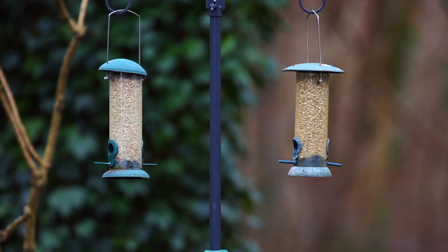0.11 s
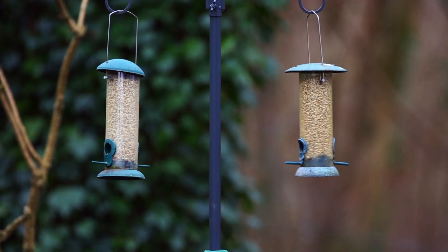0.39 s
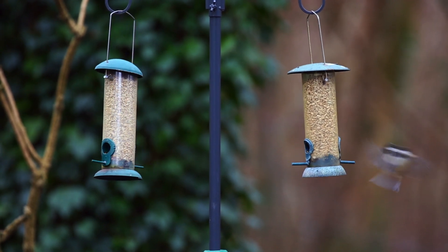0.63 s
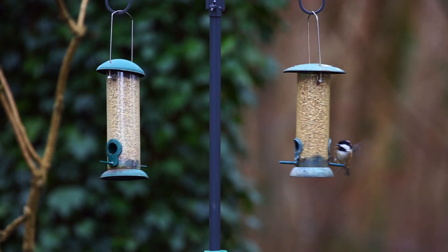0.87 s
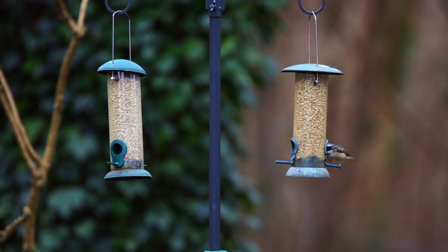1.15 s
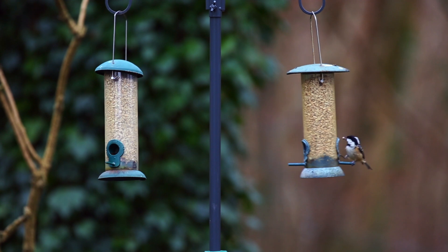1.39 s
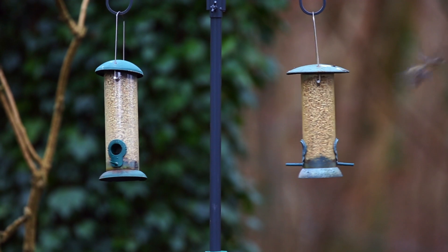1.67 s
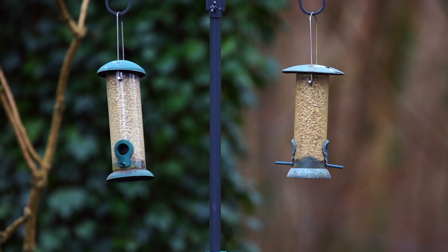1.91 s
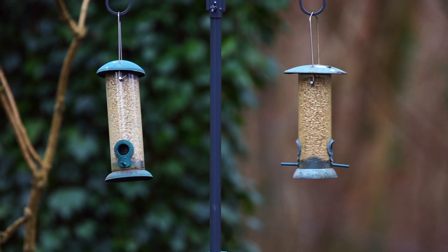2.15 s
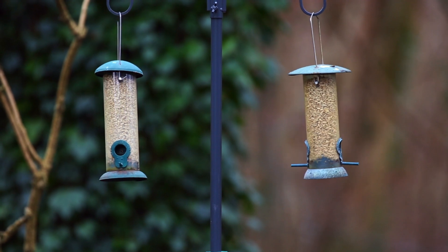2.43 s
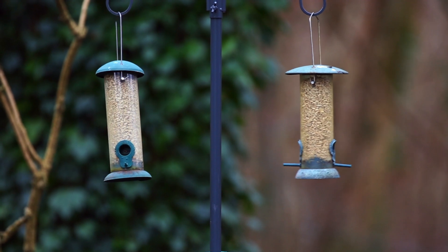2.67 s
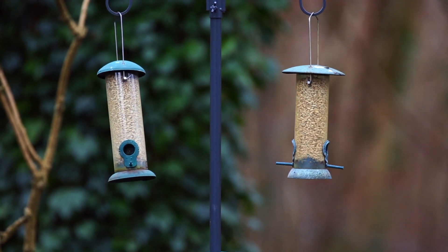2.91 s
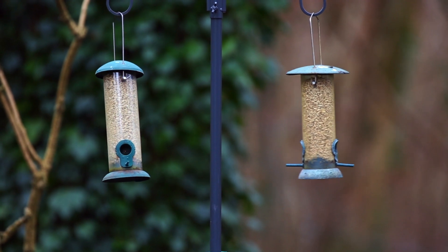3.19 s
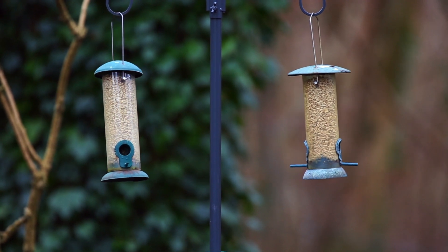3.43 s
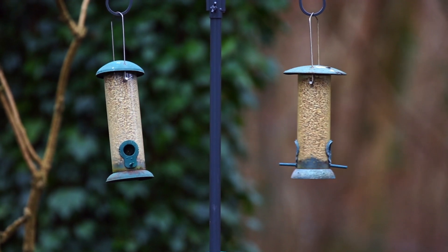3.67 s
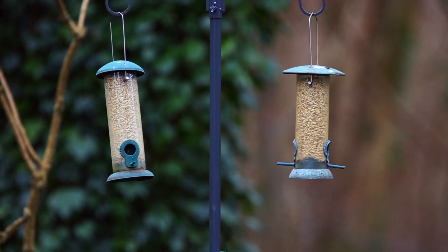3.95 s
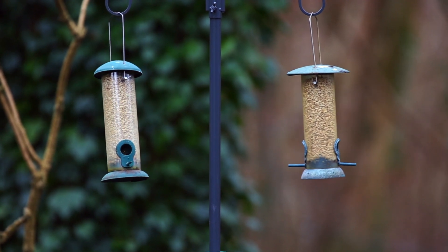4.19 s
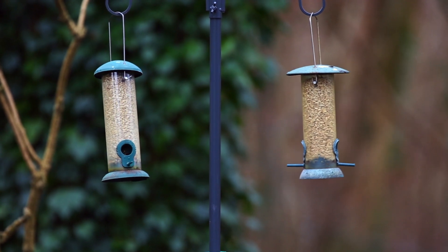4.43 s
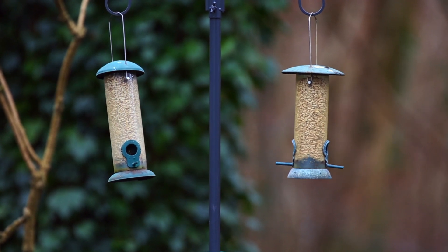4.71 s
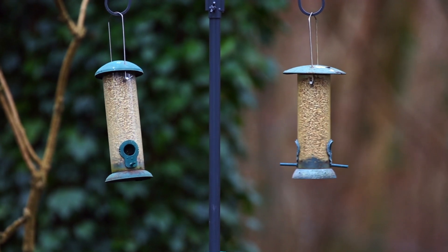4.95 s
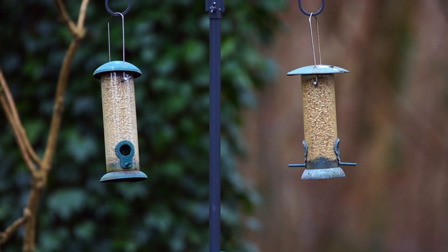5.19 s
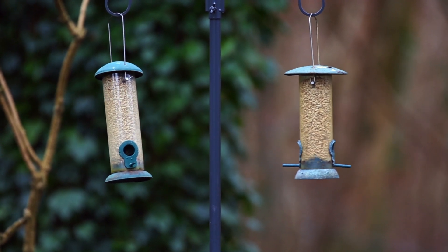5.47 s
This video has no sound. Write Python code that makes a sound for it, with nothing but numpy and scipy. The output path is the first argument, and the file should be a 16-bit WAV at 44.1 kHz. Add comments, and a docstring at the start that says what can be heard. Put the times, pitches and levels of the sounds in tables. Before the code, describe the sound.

At a garden feeder by a wood, sparse faint notes give way to crisp chips, a falling slur and an arched whistle. Around 1.5 seconds a small bird leaves with six rapid, dry wing snaps and an airy whirr. Rising whistles, chirps and buzzes follow, blurred by short tree echoes. A sensitive outdoor microphone catches faint hiss, far road roar and soft low wind bumps.

```python
"""From the start lie a patchy hiss and far road roar, with a light wind bumping on the microphone.
Small birds soon call at the edge of a wood: faint far notes, chips, a falling slur, an arched whistle.
Near 1.5 s a bird leaves with six wing snaps, two to each wing cycle: noise puffs in feather resonances,
a whirr, short whistles. Then come risers from deep in the wood, chirps, buzzes, pulsed whistles and slurs,
all gliding near-sine tones; from the first note on, noise-built echoes smear them back from the trees."""
import sys
import numpy as np
from scipy import signal
from scipy.fft import rfft, irfft
from scipy.io import wavfile

SR = 44100
rng = np.random.default_rng(int(sys.argv[2]) if len(sys.argv) > 2 else 0)


def linear_from_db(decibels):
    """Turn decibels (scalar or array-like) into linear amplitude factors; 0 gives 1."""
    return 10 ** (np.asarray(decibels, float) / 20)


def inscribe(sig):
    """Save sig as 16-bit PCM at rate SR to the path in sys.argv[1].

    A 1-D sig is mono; a 2-D sig holds one channel per row.
    Samples are clipped to [-1, 1] before scaling.
    """
    pcm = np.round(np.clip(np.atleast_2d(sig).T, -1, 1) * 32767)
    wavfile.write(sys.argv[1], SR, pcm.astype(np.int16))


N = 246519

# Gusts. Each row: time in seconds, then rumble on the microphone and far roar as relative levels in dB.
GUSTS = [(0.0, -72, -67), (0.4, -78, -66), (.8, -73, -65), (1.15, -59, -62), (1.43, -72, -63),
         (1.65, -70, -61.5), (2.3, -58, -63.5), (2.93, -57.5, -61), (3.4, -56, -63), (3.65, -62, -67.5),
         (4.02, -59, -63), (4.48, -65, -66), (4.79, -65, -64), (4.92, -78, -65), (5.1, -67, -67),
         (5.59, -72, -67)]
# Noise colours of roar, wind and hiss. Each row: frequency in Hz, relative level in dB.
ROAR_COLOUR = [(60, -20.5), (150, -7), (300, -1.5), (600, -0.5), (1000, -1), (1400, -5), (1900, -12),
               (2600, -20), (4000, -25.5), (9000, -58)]
RUMBLE_COLOUR = [(30, -38), (60, -24), (120, -6), (220, 5.5), (290, 5), (450, 0.5), (800, -31.5),
                 (2500, -84)]
HISS_COLOUR = [(1200, -14.5), (2000, -13), (3000, -3.5), (5000, -5.5), (8000, -6), (12000, -9.5),
               (14500, -16.5), (16000, -18)]
HISS_DB, CUTOFF_HZ = -73.5, 15750
# The strongest wind bumps. Each row: time in seconds (8.4 ms ahead of the middle), relative level in dB.
STRONG_BUMPS = [(1.044, -42), (1.301, -43.5), (1.656, -46), (2.338, -32.5), (2.441, -40), (2.648, -37),
                (2.696, -37.5), (2.737, -34.5), (2.887, -35.5), (3.025, -38), (3.142, -39), (3.185, -40.5),
                (3.277, -41.5), (3.369, -36.5), (3.569, -44), (4.03, -38.5), (4.168, -44.5), (4.296, -45),
                (4.495, -45.5), (5.093, -48)]
BUMP_HZ, BUMP_SPREAD_HZ, SMALL_BUMPS_OVER_RUMBLE_DB = 244, 7, 11

# Faint notes of far birds. Each row: start in seconds, length in seconds, glide from Hz, glide to Hz,
# level at the loudest moment in dB rms, before the flicker of the air.
FAR_NOTES = [(.055, .05, 3200, 3060, -66), (.39, .07, 3900, 4200, -68), (.515, .035, 2700, 2300, -63),
             (.695, .04, 7300, 6700, -73), (1.17, .08, 7280, 7280, -73), (1.775, .045, 6900, 6800, -64),
             (1.898, .07, 7150, 7100, -55), (2.42, .04, 8200, 8550, -75), (2.59, .07, 7250, 7280, -68),
             (4.06, .025, 4150, 3900, -63), (4.762, .035, 4100, 4030, -57)]
# Short chips. Each row: start in seconds, length in seconds, glide from Hz, glide to Hz,
# level at the loudest moment in dB rms, before any flicker of the air.
CHIPS = [(.8, .008, 4300, 3750, -45), (.82, .022, 5450, 5300, -50), (.835, .033, 2250, 1850, -46),
         (.838, .024, 5700, 5950, -38), (.843, .018, 9180, 9160, -47), (.843, .016, 3400, 3350, -42),
         (.931, .007, 4600, 4600, -46), (.937, .01, 5000, 6400, -53), (.944, .022, 6450, 6300, -41),
         (.948, .014, 12100, 11900, -62), (1.553, .055, 6900, 6550, -40), (1.877, .028, 3250, 2950, -57),
         (1.88, .035, 2000, 1660, -57), (2.19, .01, 5570, 5600, -51), (2.33, .015, 4530, 4650, -44),
         (2.527, .033, 2200, 1850, -42)]
# Smooth slurs that fall fast, then level off. Each row: start in seconds, length in seconds,
# glide from Hz, glide to Hz, loudest level in dB rms (before any flicker), swell in seconds, octave in dB.
SLURS = [(.95, .082, 6050, 4850, -42.5, .014, -8), (1.54, .058, 5000, 4100, -42, .015, -5),
         (4.415, .07, 5900, 5080, -45, .03, -29), (4.632, .065, 4400, 3950, -39, .03, -21),
         (5.41, .06, 5700, 5200, -61, .025, -40)]
# A clean arched whistle close by. Each row: start in seconds, length in seconds, glide from Hz,
# glide to Hz, level at the loudest moment in dB rms, swell in seconds, octave in dB.
ARCHES = [(1.162, .06, 4620, 4600, -38, .034, -13)]
# Rising whistles from deep in the wood. Each row: start in seconds, length in seconds,
# glide from Hz, glide to Hz, level at the loudest moment in dB rms.
RISERS = [(1.93, .073, 5570, 8000, -34), (3.953, .082, 5300, 7500, -40)]
# Clear chirps ending in a downward hook. Each row: start in seconds, length in seconds, glide from Hz,
# glide to Hz, level at the loudest moment in dB rms, swell in seconds, octave in dB.
CHIRPS = [(2.192, .094, 5450, 4780, -34.5, .045, -20), (2.346, .056, 4450, 4880, -34, .006, -22)]
# Buzzy, strongly warbled chirps. Each row: start in seconds, length in seconds, glide from Hz,
# glide to Hz, level at the loudest moment in dB rms, swell in seconds, octave in dB.
BUZZES = [(2.772, .096, 4850, 4650, -36.5, .03, -14), (2.998, .052, 5150, 4650, -36, .02, -13),
          (3.044, .046, 4750, 3800, -38, .012, -14)]
# Level whistles in pulses. Each row: start in seconds, length in seconds, pitch in Hz, full level in dB rms.
PULSED = [(2.933, .078, 4470, -32), (3.887, .082, 4470, -32)]
# Voices. Each holds: softening at the start in dB, softening at the end in dB, echo level in dB,
# warble as a share of pitch, scoop from below in Hz, closing downward hook in Hz,
# glide exponent (lower hurries), third harmonic in dB.
FAR_VOICE = (14, 10, -7, .011, 20, 20, .95, -60)
CHIP_VOICE = (18, 12, -11.5, .016, 100, 30, .95, -60)
SLUR_VOICE = (24, 8, -7.5, .013, 250, 20, .45, -45)
ARCH_VOICE = (30, 10, -13, .005, 350, 600, .9, -31)
RISER_VOICE = (32, 4, -7, .005, 20, 20, .9, -60)
CHIRP_VOICE = (22, 2.5, -4.5, .013, 250, 500, .35, -55)
BUZZ_VOICE = (24, 2.5, -1.2, .032, 400, 50, .75, -43)
PULSED_VOICE = (11, 11, -6, .002, 30, 50, .9, -57)
WARBLE_HZ, WOBBLE_HZ = 71.19, 119.34   # steady warble, chance wobble
SCOOP_S, HOOK_S = .006, .006
SWELL_CURVE = 1.7   # the swell starts steeply and flattens towards the peak
PULSE_HZ, PULSE_DB = 26.5, 11
PULSED_SWELL_S, PULSED_OCTAVE_DB, PURE_OCTAVE_DB = .004, -11, -52
RISER_PEAK, CHIP_PEAK, FAR_PEAK = .7, .4, .45   # loudest moment as share of the length

# Echoes from the trees. Each row: low edge in Hz, high edge in Hz,
# 60 dB decay time in seconds before stretching, relative level in dB.
TREE_BANDS = [(980, 3000, 0.22, 1.5), (3000, 4080, .19, -3), (3900, 6280, 0.27, -1.5),
              (6250, 8300, 0.19, -1), (8364, 10800, 0.16, 0)]
# Dips in the echo tail. Each row: seconds after the call, spread in seconds, level change in dB.
ECHO_DIPS = [(0.038, 0.0387, 0), (.09, 0.017, -2.5), (.13, .015, -5)]
EDGE_S, EDGE_DB = .115, 7.5   # past the nearest row of trees the returns drop away

# Air whirring through the wings: start in seconds, rise in seconds, end in seconds, fall in seconds.
WHIRR_SPAN = (1.519, .03, 1.74, .045)
# Whirr bands. Each row: low edge in Hz, high edge in Hz.
WHIRR_BANDS = [(2717, 3766), (6340, 7580), (940, 6060)]
# Low and high whirr. Each row: level in dB rms before throb and grain, throb swing in dB,
# time of a throb peak in seconds.
WHIRR_LEVELS = [(-55, 4.5, 1.566), (-54.5, 3.5, 1.58)]
WHIRR_EDGE_DB = 20
# Feather snaps, two to each wing cycle. Each row: time in seconds (2 ms after onset), relative level in dB.
WING_SNAPS = [(1.5234, -48), (1.5661, -38.5), (1.6052, -40), (1.6468, -45), (1.686, -39), (1.7268, -39)]
# What a snap rings with. Each row: mean frequency in Hz before chance shift,
# width of each of two filter passes in Hz, relative level in dB.
FEATHERS = [(3450, 485, 3.5), (6900, 516, 1.5), (7495, 450, 0), (8900, 1500, -28), (11570, 434, 0),
            (12600, 570, -6), (13500, 2500, -17), (14740, 600, -14.5)]
# Feather whistles after every other snap. Each row: seconds after it, from Hz, to Hz,
# length in seconds, level at the fullest in dB rms.
SNAP_WHISTLES = [(.019, 3850, 2800, .018, -49), (.045, 3200, 2950, .0115, -42)]


def rms_one(x):
    """Scale to rms 1."""
    return x / np.sqrt(np.mean(x ** 2) + 1e-20)


def in_time(rows, t):
    """Each column joined by straight lines at the times t."""
    s, *columns = np.transpose(rows)
    return [np.interp(t, s, c) for c in columns]


def band(x, low_hz, high_hz):
    """Steep band-pass."""
    return signal.sosfilt(signal.butter(4, [low_hz, high_hz], "band", fs=SR, output="sos"), x)


def drift(rate_hz):
    """Slow chance of spread 1, drawn at every 20th sample."""
    r = np.exp(-40 * np.pi * rate_hz / SR)
    steps = N // 20 + 2
    slow = signal.lfilter([1], [1, -2 * r, r * r], rng.standard_normal(2 * steps))[steps:]
    return np.interp(np.arange(N) / 20, np.arange(steps), rms_one(slow))


def coloured(spectrum, patchy_db, rate_hz):
    """Noise of rms 1 with the given spectrum; each narrow band swells and sinks on its own."""
    hz = np.maximum(np.arange(N // 2 + 1) * SR / N, 1)
    point_hz, point_db = np.transpose(spectrum)
    shape = linear_from_db(np.interp(np.log(hz), np.log(point_hz), point_db))
    noise = rfft(rng.standard_normal(N)) * shape
    place = np.clip(3 * np.log2(hz / 125) + hz / 800, 0, 41)   # position along 42 overlapping bands
    total = np.zeros(N)
    for k in range(42):
        part = irfft(noise * np.clip(1 - abs(place - k), 0, 1), N)
        total += linear_from_db(patchy_db * drift(rate_hz)) * part
    return rms_one(total)


def add(track, sound, s):
    """Mix a sound in at time s."""
    i = round(s * SR)
    track[i:i + len(sound)] += sound[:N - i]


def hiss():
    """Patchy hiss: coloured noise whose narrow bands swell and sink, each on its own."""
    return linear_from_db(HISS_DB) * coloured(HISS_COLOUR, patchy_db=2.1, rate_hz=18)


def road_roar(roar_db):
    """Far road noise: patchy low-weighted noise with a slowly changing level."""
    return linear_from_db(roar_db + 5.5627) * coloured(ROAR_COLOUR, patchy_db=3.5, rate_hz=6.84)


def wind_rumble(rumble_db):
    """Lumpy low noise of wind on the microphone."""
    return linear_from_db(rumble_db - 2.5 + 2.2 * drift(15)) * coloured(RUMBLE_COLOUR, patchy_db=1.5, rate_hz=10)


def wind_bumps(rumble_db):
    """Eddies push the membrane for a few cycles, a deeper thud under them; small ones come at random."""
    out = np.zeros(N)
    t = np.arange(-SR // 20, SR // 20) / SR
    when, size = rng.random((14, 2)).T
    at = ((.02 + .96 * when) * N).astype(int)
    small = list(zip(at / SR, rumble_db[at] + SMALL_BUMPS_OVER_RUMBLE_DB - 8.0 * size))
    bumps = STRONG_BUMPS + small
    chances = rng.standard_normal((len(bumps), 2))
    for (s, db), (turn, off) in zip(bumps, chances):
        hz = BUMP_HZ + BUMP_SPREAD_HZ * off
        push = np.sin(2 * np.pi * (hz * t + turn))
        thud = linear_from_db(-16.0) * np.sin(2 * np.pi * (0.476 * hz * t + turn))
        bell = np.exp(-.5 * (t / 0.00482) ** 2)
        add(out, linear_from_db(db - 6.0) * bell * (push + thud), s + 0.008385 + t[0])
    return out


def songbook():
    """Every note as (s, length, from Hz, to Hz, dB, swell s, octave dB, voice, pulse depth dB, deep)."""
    notes = []
    for rows, peak, voice, deep in [(FAR_NOTES, FAR_PEAK, FAR_VOICE, 0), (CHIPS, CHIP_PEAK, CHIP_VOICE, 0),
                                    (RISERS, RISER_PEAK, RISER_VOICE, 1)]:
        notes += [(*row, peak * row[1], PURE_OCTAVE_DB, voice, 0, deep) for row in rows]
    for rows, voice in [(SLURS, SLUR_VOICE), (ARCHES, ARCH_VOICE), (CHIRPS, CHIRP_VOICE), (BUZZES, BUZZ_VOICE)]:
        notes += [(*row, voice, 0, 0) for row in rows]
    for s, length, hz, db in PULSED:
        notes.append((s, length, hz, hz, db, PULSED_SWELL_S, PULSED_OCTAVE_DB, PULSED_VOICE, PULSE_DB, 0))
    return notes


def birds():
    """Gliding near-sine whistles, weak overtones: the direct sound, and sends to the wood's edge and depth."""
    near, far, air = np.zeros(N), np.zeros((2, N)), drift(55)
    wobble = 0.45 * drift(WOBBLE_HZ)
    for s, length, from_hz, to_hz, db, swell, octave_db, voice, pulse_db, deep in songbook():
        start_db, end_db, echo_db, depth, scoop_hz, hook_hz, haste, third_db = voice
        t = np.arange(round(length * SR)) / SR
        at = round(s * SR) + np.arange(len(t))

        hz = from_hz + (to_hz - from_hz) * (t / length) ** haste
        hz = hz - scoop_hz * np.exp(-t / SCOOP_S) - hook_hz * np.exp((t - length) / HOOK_S)
        warble = wobble[at] - np.cos(2 * np.pi * WARBLE_HZ * t)   # the steady part starts afresh each note
        phase = 2 * np.pi * np.cumsum(hz * (1 + depth * warble)) / SR

        level_db = db - start_db * np.clip(1 - t / swell, 0, 1) ** SWELL_CURVE
        level_db = level_db - np.interp(t, [swell, length], [0, end_db])
        level_db = level_db - pulse_db * np.sin(np.pi * PULSE_HZ * (t - 2 * swell)) ** 2

        softer_db = .3 * (level_db - db)   # overtones fade first as the voice softens
        # overtones that would pass half the sample rate are left out
        octave = linear_from_db(octave_db + softer_db) * np.sin(2 * phase) * (2 * hz.max() < SR / 2)
        third = linear_from_db(third_db + 2 * softer_db) * np.sin(3 * phase) * (3 * hz.max() < SR / 2)
        tone = np.sin(phase) + octave + third
        edges = np.sin(np.pi / 2 * np.clip(np.minimum(t, length - t) / .0025, 0, 1)) ** 2
        flicker_db = np.clip(-.2 * (db + 48), 0, 5) * air[at]   # faint, far voices flicker in the air
        near[at] += np.sqrt(2) * linear_from_db(level_db + flicker_db) * edges * tone
        far[deep, at] += np.sqrt(2) * linear_from_db(level_db + echo_db) * edges * tone
    return near, far


def trees(x, stretch):
    """Countless small returns from trunks and leaves: noise that dies band by band, with thinner stretches."""
    t = np.arange(SR // 2) / SR
    noise = rng.standard_normal(len(t))
    tail = np.zeros(len(t))
    for low, high, t60, db in TREE_BANDS:
        tail += linear_from_db(db - 60 * t / (t60 * stretch)) * band(noise, low, high)
    dips_db = sum(db * np.exp(-.5 * ((t - s) / spread) ** 2) for s, spread, db in ECHO_DIPS)
    tail = tail * linear_from_db(dips_db) * np.clip(t / 0.0021, 0, 1)
    tail = tail * linear_from_db(-EDGE_DB / (1 + np.exp((EDGE_S - t) / .008)))
    shimmer = 1 + 0.5 * drift(110)   # moving leaves: a quick level flutter smears the pitch
    return signal.fftconvolve(x * shimmer, tail * linear_from_db(-27.5))[:N]


def whirr():
    """Grainy air noise in three bands while the wings beat, throbbing once per pair of snaps."""
    t, out = np.arange(N) / SR, np.zeros(N)
    start, rise, end, fall = WHIRR_SPAN
    pair = 2 * np.mean(np.diff([s for s, _ in WING_SNAPS]))
    edge_db = -WHIRR_EDGE_DB * np.interp(t, [start, start + rise, end, end + fall], [1, 0, 0, 1])
    low_db, high_db = [db + edge_db + throb_db * np.cos(2 * np.pi * (t - s) / pair)
                       for db, throb_db, s in WHIRR_LEVELS]
    for level_db, (low, high) in zip([low_db, high_db, low_db - 4.5], WHIRR_BANDS):
        grain_db = 2.5 * drift(100)
        out += linear_from_db(level_db + grain_db) * rms_one(band(rng.standard_normal(N), low, high))
    return out * (t > start) * (t < end + fall)


def feather_snaps():
    """Noise puffs of a few milliseconds, each driving the feather resonances."""
    out = np.zeros(N)
    after = np.arange(SR // 12) / SR
    decay = np.exp(-after / 0.00268) + 0.072 * np.exp(-after / 0.0094)
    puff = np.clip(after / 0.00244, 0, 1) * decay
    for s, db in WING_SNAPS:
        for hz, width_hz, mode_db in FEATHERS:   # every snap strikes each resonance a little differently
            r = np.exp(-np.pi * width_hz / SR)
            shift, strength_db = rng.normal(1, 0.022), rng.normal(-.5, 3.5)
            poles = [1, -2 * r * np.cos(2 * np.pi * hz * shift / SR), r * r]
            zeros = np.array([1, 0, -1]) * (1 - r * r) / 2
            once = signal.lfilter(zeros, poles, puff * rng.standard_normal(len(puff)))
            snap = signal.lfilter(zeros, poles, once)
            add(out, linear_from_db(db + mode_db + strength_db + 18.0) * snap, s - .002)
    return out


def feather_whistles():
    """Short falling sine glides after every other snap."""
    out = np.zeros(N)
    for s, _ in WING_SNAPS[::2]:
        for lag, from_hz, to_hz, length, db in SNAP_WHISTLES:
            glide = np.linspace(from_hz, to_hz, round(length * SR))
            swell = np.hanning(len(glide)) ** .5
            tone = np.sin(2 * np.pi * np.cumsum(glide) / SR)
            add(out, np.sqrt(2) * linear_from_db(db) * swell * tone, s + lag)
    return out


def scene():
    """Birds, wings and their echoes over roar and wind."""
    rumble_db, roar_db = in_time(GUSTS, np.arange(N) / SR)
    wind = wind_rumble(rumble_db) + wind_bumps(rumble_db)
    near, far = birds()
    flight = whirr() + feather_snaps() + feather_whistles()
    edge_echo = trees(far[0] + linear_from_db(-13.5) * flight, stretch=1.1)
    deep_echo = linear_from_db(4.0) * trees(far[1], stretch=1.5)
    return (near + flight + edge_echo + deep_echo + road_roar(roar_db) + wind)[None]


def band_limit(x):
    """A steep low-pass at the top of the band."""
    return signal.sosfilt(signal.butter(12, 16400, fs=SR, output="sos"), x)


def record(dry):
    """Add the patchy hiss and cut the top steeply."""
    hissy = dry + hiss()
    top_cut = signal.ellip(12, .5, 70, CUTOFF_HZ, fs=SR, output="sos")
    mix = signal.sosfilt(top_cut, hissy)
    return band_limit(mix)


dry = scene()
out = record(dry)
inscribe(out)
```